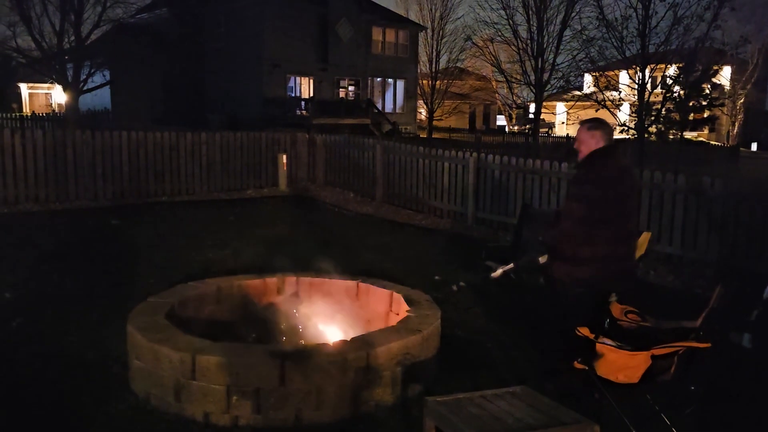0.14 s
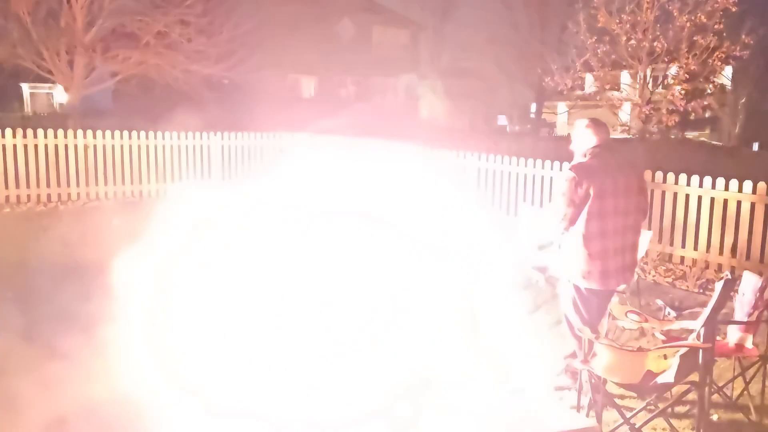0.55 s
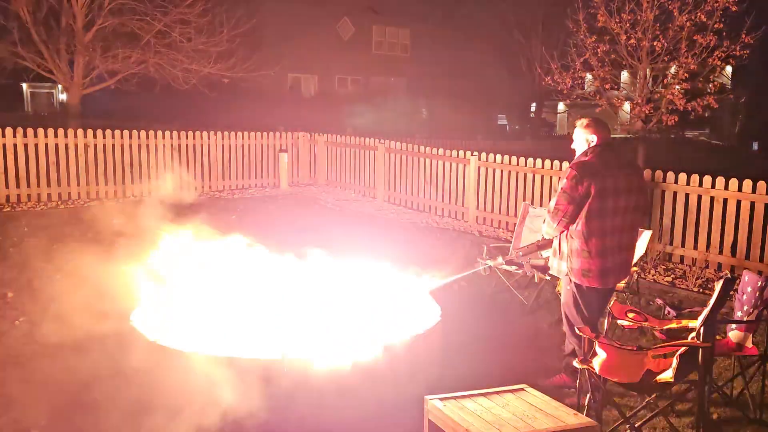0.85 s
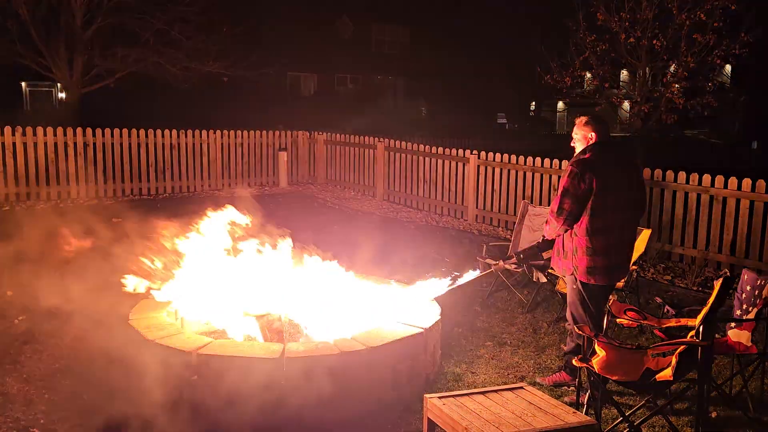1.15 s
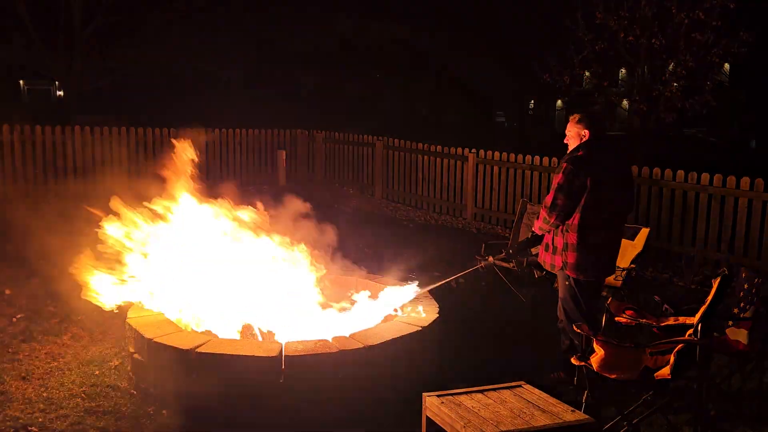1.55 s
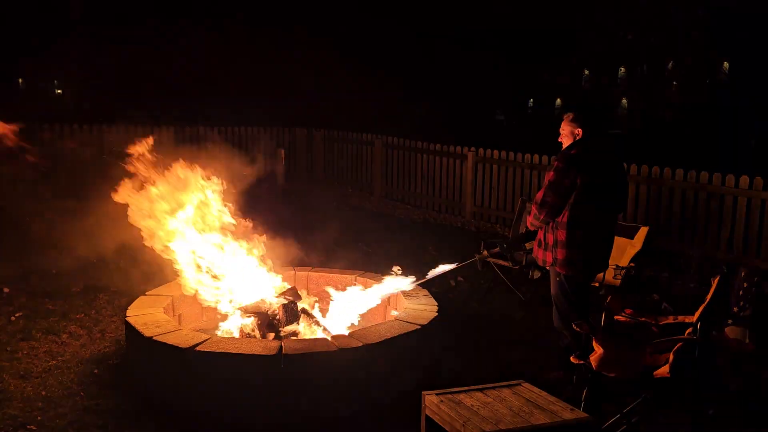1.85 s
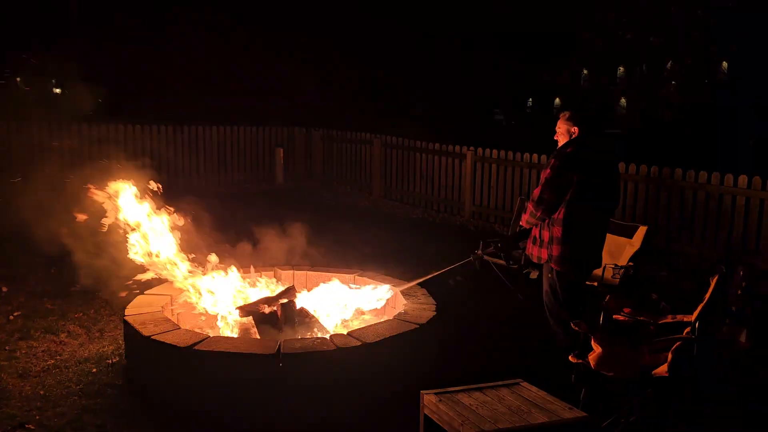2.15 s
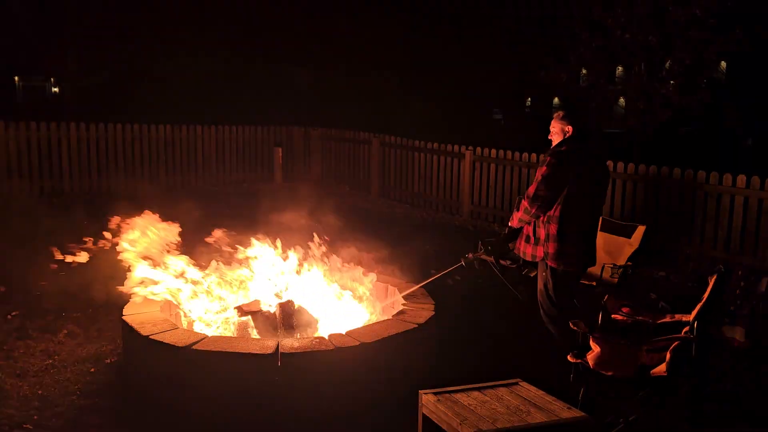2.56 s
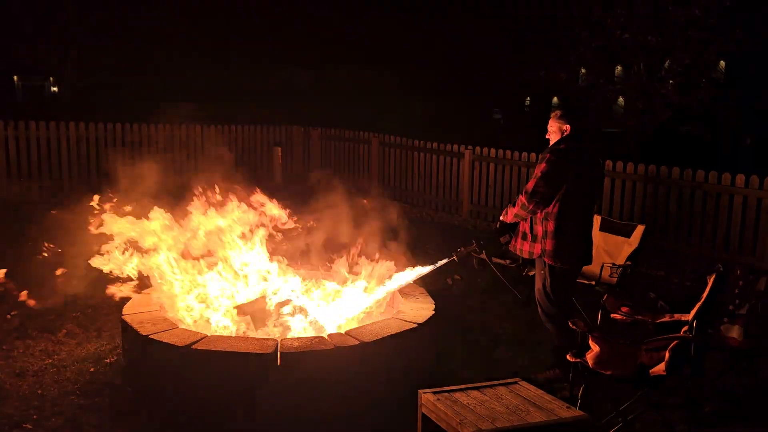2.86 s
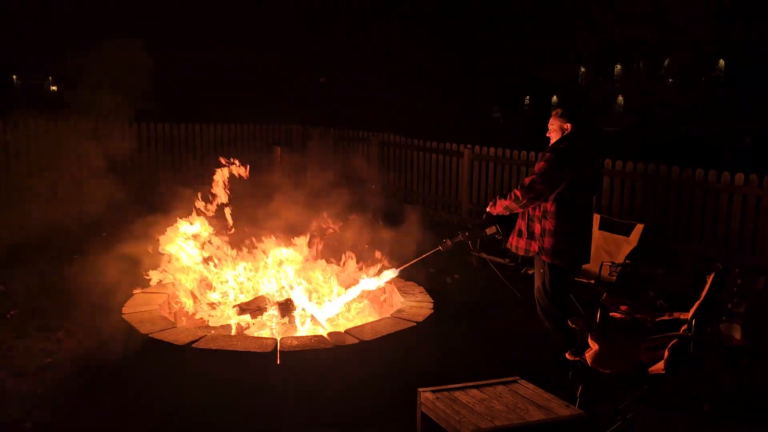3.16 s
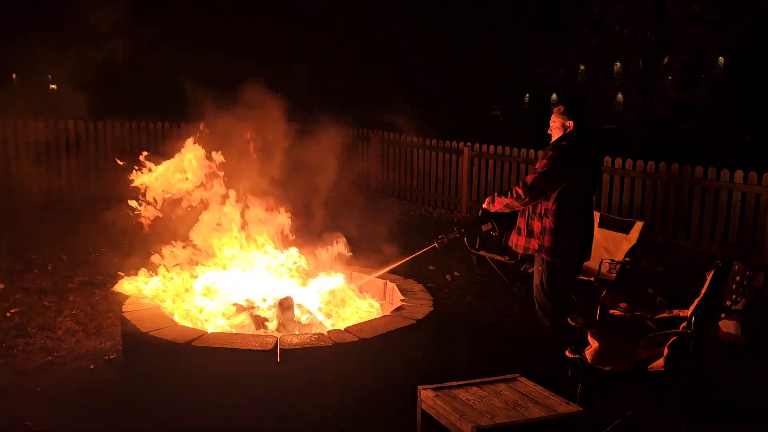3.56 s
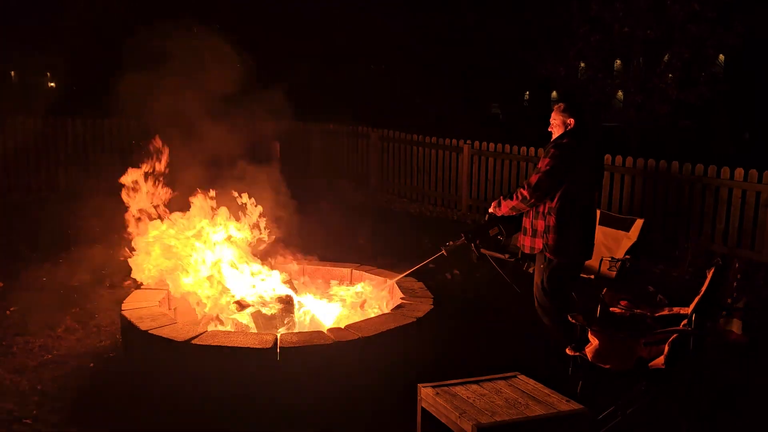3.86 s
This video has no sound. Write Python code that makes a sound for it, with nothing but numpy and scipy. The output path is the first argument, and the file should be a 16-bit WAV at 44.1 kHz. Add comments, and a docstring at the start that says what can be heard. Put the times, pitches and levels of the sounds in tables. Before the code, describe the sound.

A handheld flame gun in a quiet backyard at night: trigger rustle and click, pump spinning up, then fast even igniter ticks over a deep surging flame roar, recorded in stereo from a few metres away.

```python
"""Backyard fire pit at night: a hand-held flame gun is fired a few metres from a phone.
Filtered noise and a wavering sine make night air and hum; noise bursts and decaying modes make trigger rustle and clicks.
Steady ticks ring the igniter's modes; motor harmonics and shaken casing whine in the pump; flickering noise is fuel hiss.
The lit jet is random bursts coloured into rumble and surging roar. Windowed sines are low thumps: a soft air puff
before lighting, then puffs of the flame."""
import sys
import numpy as np
from scipy import signal
from scipy.fft import rfft, irfft
from scipy.io import wavfile
from scipy.ndimage import uniform_filter1d

SR = 44100
rng = np.random.default_rng(int(sys.argv[2]) if len(sys.argv) > 2 else 0)


def wrap_up_sound(samples):
    """Save the sound to the file named by the first command line argument, as 16-bit audio."""
    columns = np.atleast_2d(samples).T
    # keep every value between -1 and 1, then stretch to whole-number steps
    tamed = np.clip(columns, -1, 1)
    steps = np.round(tamed * 32767).astype(np.int16)
    wavfile.write(sys.argv[1], SR, steps)


def natural_amplitude(level_db):
    """Convert a level in decibels to a linear amplitude factor, elementwise."""
    exponent = np.asarray(level_db, float) / 20
    return 10 ** exponent


N = 176400
TIME_S = np.arange(N) / SR
FREQ_HZ = np.maximum(np.arange(N // 2 + 1) * SR / N, 1)
RIGHT_LAG_S = 0.000091
BASS_WIDTH, TREBLE_WIDTH = 0.059, 1  # independent share of each channel, 0-1


def level(x, db):
    """Scale to an rms level."""
    return x * natural_amplitude(db) / np.sqrt(np.mean(x ** 2))


def curve(points):
    """Gain per frequency bin from (frequency [Hz], gain [dB]) points, log-frequency interpolation."""
    hz, db = np.array(points, float).T
    gain_db = np.interp(np.log(FREQ_HZ), np.log(np.maximum(hz, 1)), db, left=-80, right=-80)
    return natural_amplitude(gain_db)


def walk(rate_hz):
    """Random levels held 1 / rate_hz and smoothed twice; spread near 1."""
    hold = int(SR / rate_hz)
    steps = np.repeat(rng.standard_normal(N // hold + 1), hold)
    return 1.52 * uniform_filter1d(uniform_filter1d(steps, hold), hold)[:N]


def eddies(rate_hz, spread_db):
    """Random bursts of unequal size: mostly small, a few large."""
    size = natural_amplitude(spread_db * rng.exponential(size=N))
    return rng.standard_normal(N) * size * (rng.random(N) < rate_hz / SR)


def turbulent(source, spectrum, shared_db, own_db, flicker_hz, alike_hz):
    """Coloured stereo turbulence at 0 dB rms; octave bands flicker together and alone; ears differ above alike_hz."""
    rise = 1 / np.sqrt(1 + (alike_hz / FREQ_HZ) ** 2)
    width = np.clip(BASS_WIDTH + (TREBLE_WIDTH - BASS_WIDTH) * rise, 0, 1)
    mid = np.sqrt(1 - width ** 2) * rfft(level(source, 0))
    lagged = mid * np.exp(-2j * np.pi * FREQ_HZ * RIGHT_LAG_S)
    side = width * rfft(rng.standard_normal((2, N)))
    pair = curve(spectrum) * (np.array([mid, lagged]) + side)

    out, shared = 0, walk(flicker_hz)
    low_octave, high_octave = np.floor(np.log2(spectrum[0][0])), np.log2(spectrum[-1][0])
    for hz in 2 ** np.arange(low_octave, high_octave + 1):
        band = np.cos(np.pi / 2 * np.clip(np.log2(FREQ_HZ / hz), -1, 1)) ** 2
        flicker_db = shared_db * shared + own_db * walk(flicker_hz * 1.7)
        out = out + irfft(pair * band, N) * natural_amplitude(flicker_db)
    return level(out, 0)


def ring(hz, t60_s, length_s):
    """One decaying mode."""
    t = TIME_S[:int(length_s * SR)]
    return np.sin(2 * np.pi * hz * t) * np.exp(-np.log(1000) * t / t60_s)


def add(out, sound, at_s):
    """Mix a sound in at a time."""
    i = int(at_s * SR)
    out[..., i:i + sound.shape[-1]] += sound[..., :N - i]


# Night air spectrum: (frequency [Hz], relative density [dB per Hz])
NIGHT_SPECTRUM = [(15, -14), (25, -3.5), (45, -2), (80, -7), (130, -9.5), (160, -25), (240, -28),
                  (350, -44), (650, -33), (900, -40.5), (2400, -48), (4000, -48.5), (7500, -49),
                  (10000, -58), (16500, -66)]
NIGHT_DB, HUM_HZ, HUM_DB = -49.5, 118.6, -51


def night():
    """Air rumble and hiss, plus a nearby machine's hum wavering in pitch and level."""
    air = natural_amplitude(NIGHT_DB) * turbulent(rng.standard_normal(N), NIGHT_SPECTRUM, .8, 1.7, 8, 500)
    hum_gain = np.sqrt(2) * natural_amplitude(HUM_DB + 1.3 * walk(14))
    hum_phase = 2 * np.pi * np.cumsum(HUM_HZ + 0.74 * walk(6.3)) / SR
    return air + hum_gain * np.sin(hum_phase)


# Sleeve and glove on the grip: (time [s], level [dB])
RUSTLE_LEVEL = [(0.06, -89), (0.092, -88), (0.12, -63), (0.17, -90), (0.32, -93), (0.336, -57.5),
                (0.37, -45), (0.382, -52), (0.392, -45.5), (0.428, -71), (0.472, -78), (0.476, -73),
                (0.5, -87)]
# Cloth spectrum: (frequency [Hz], relative density [dB per Hz])
CLOTH_SPECTRUM = [(180, -24), (300, -17), (513, -10), (729, -13), (1270, -18), (2610, -25), (3770, -11.5),
                  (7250, -8), (8580, -15), (14200, -22), (16500, -42)]
# Trigger clicks: (time [s], level of the body mode [dB], body mode [Hz])
TRIGGER_CLICKS = [(.364, -49, 890), (.388, -30.5, 300), (0.423, -48, 600)]


def grip():
    """Cloth friction is bursts of coloured noise; each trigger click rings a body mode and two higher modes."""
    s, db = np.array(RUSTLE_LEVEL).T
    cloth = turbulent(eddies(6000, 3.0), CLOTH_SPECTRUM, 0.8, 1.2, 60, 5000)
    out = cloth * natural_amplitude(np.interp(TIME_S, s, db, left=-120, right=-120))
    for at_s, db, hz in TRIGGER_CLICKS:
        click = ring(hz, 0.0085, .05) + .5 * ring(7200, 0.0047, .05) + .2 * ring(3600, 0.0097, .05)
        add(out, natural_amplitude(db) * click, at_s)
    return out


# Each tick, its rebounds and its echo off the stones: (delay [s], relative level [dB])
TICK_REBOUNDS = [(0, 2.5), (.0019, -2.5), (.0037, 1), (.0053, 0)]
# What a tick rings with: (frequency [Hz], relative level [dB], t60 [s])
TICK_RING_MODES = [(1830, -34, 0.0096), (2540, -9, 0.0089), (4580, -3, 0.0058), (6550, -12, 0.019),
                   (7020, -8.5, 0.0089), (7670, -9.5, 0.01), (8270, -2.5, 0.0048), (9300, -35, 0.0033),
                   (11140, -22, 0.011), (12700, -7, 0.0039), (14400, -9, 0.0045), (15500, -20, .004)]
TICK_FIRST_S, TICK_PERIOD_S = .5617, .053472
TICK_GAIN_DB, TICK_SCATTER_DB, TICK_COLOUR_DB = -27.5, 1.9, 1.8


def igniter():
    """Even ticks: a crack and short modes, rebounding; each ear's colour differs and drifts as the gun is moved."""
    at = (np.arange(TICK_FIRST_S, N / SR, TICK_PERIOD_S) * SR).astype(int)
    ear_lag = np.array([[0], [int(RIGHT_LAG_S * SR)]])
    # column 0: whole tick; the rest: each rebound
    scatter_db = TICK_SCATTER_DB * rng.standard_normal((len(at), 1 + len(TICK_REBOUNDS)))
    ringing = np.zeros((2, N))
    for hz, db, t60_s in TICK_RING_MODES:
        blows, drift = np.zeros((2, N)), walk(2.666)[at]
        for k, (lag_s, lag_db) in enumerate(TICK_REBOUNDS):
            jitter = rng.integers(0, 9, len(at))
            place = np.minimum(at + int(lag_s * SR) + jitter + ear_lag, N - 1)
            colour_db = TICK_COLOUR_DB * (drift + 1.2 * rng.standard_normal((2, len(at))))
            gain = natural_amplitude(db + lag_db + scatter_db[:, 0] + scatter_db[:, k + 1] + colour_db)
            np.put_along_axis(blows, place, gain, axis=1)
        ringing += signal.fftconvolve(blows, ring(hz, t60_s, .04)[None], axes=1)[:, :N]

    since_s = (TIME_S - TICK_FIRST_S) % TICK_PERIOD_S
    decay = np.exp(-since_s / 0.0026) + 0.21 * np.exp(-since_s / 0.0054)
    gate = (TIME_S > TICK_FIRST_S) * decay
    colour = curve([(2000, -11), (6000, -5), (8000, 3), (10500, -6), (13500, 0.0), (16800, 0.5)])
    crack = irfft(rfft(rng.standard_normal((2, N))) * colour, N)
    return natural_amplitude(TICK_GAIN_DB) * (.5 * ringing + level(crack, -1) * gate)


# Pump run: (time [s], commutator rate [Hz], share by which the gear tone at 5.6 replaces 5.83 and 6 [1])
PUMP_RUN = [(.505, 400, .1), (.545, 432, .1), (.62, 437, .1), (1.5, 436, .15), (2.8, 434.6, .35),
            (3.15, 434, .95), (4, 433.7, 1.1)]
# Whine partials: (multiple of commutator rate [1], rms before gear weight and motor envelope [dB])
WHINE_PARTIALS = [(3, -66), (4, -61.5), (5, -68), (5.6, -49), (5.83, -55), (6, -52.5), (7, -66), (8, -62),
                  (10.4, -82), (12, -73), (27, -69)]
# Casing resonances shaken by the motor: (frequency [Hz], width [Hz], rms before motor envelope [dB])
CASING_MODES = [(1860, 90, -69.5), (2534, 420, -55.5), (4430, 200, -53.5), (5060, 200, -77),
                (6250, 250, -69), (11600, 430, -61)]
# Fuel spray spectrum: (frequency [Hz], relative density [dB per Hz])
HISS_SPECTRUM = [(600, 0.5), (1500, -4), (2500, -1.5), (4400, -1.5), (5000, 0.5), (5300, -2), (6500, -4),
                 (7500, 0), (9500, -3), (10600, -5.5), (11600, -2), (12300, -3), (13500, -3.5), (15000, -6),
                 (15600, -10), (17000, 4.5)]
PUMP_ON_S, PUMP_RISE_S, SPRAY_RISE_S = 0.5046, 0.059, 0.051
START_LOAD_DB, START_LOAD_S = 9, .08
HISS_DB, WHINE_WAVER_DB = -42, 1.1


def pump_and_spray():
    """The pump spins up: commutator and gear partials whine and the casing buzzes over the spray's hiss."""
    s, hz, share = np.array(PUMP_RUN).T
    since_s = np.clip(TIME_S - PUMP_ON_S, 0, None)
    start_load = natural_amplitude(START_LOAD_DB * np.exp(-since_s / START_LOAD_S))
    motor = (1 - np.exp(-since_s / PUMP_RISE_S)) * start_load
    phase = 2 * np.pi * np.cumsum(np.interp(TIME_S, s, hz) + 0.33 * walk(20)) / SR
    gear = np.interp(TIME_S, s, share)

    body = 0
    for multiple, db in WHINE_PARTIALS:
        if 5.5 < multiple < 5.7:
            weight = gear
        elif 5.7 < multiple < 6.1:
            weight = 1.25 - gear
        else:
            weight = .6 + .5 * gear
        gain = np.sqrt(2) * natural_amplitude(db + WHINE_WAVER_DB * walk(20))
        body = body + weight * gain * np.sin(multiple * phase)
    shake = rfft(rng.standard_normal(N))
    for hz, width_hz, db in CASING_MODES:
        resonance = 1 / (1 + (2 * (FREQ_HZ - hz) / width_hz) ** 2)
        body = body + level(irfft(shake * resonance, N), db)
    pump = motor * np.array([body, np.roll(body, int(RIGHT_LAG_S * SR))])

    hiss = turbulent(rng.standard_normal(N), HISS_SPECTRUM, 1.0, 0.68, 15, 1670)
    spray = (1 - np.exp(-since_s / SPRAY_RISE_S)) ** 2
    return pump + spray * natural_amplitude(HISS_DB) * hiss


# Flame: (time [s], fireball rumble before RUMBLE_GAIN_DB [dB], roar of the jet on the logs before ROAR_GAIN_DB [dB])
FLAME_LEVEL = [(0.56, -66, -69), (0.61, -23, -48), (0.68, -18, -29.5), (0.7, -22, -34.5),
               (0.81, -27.5, -31), (1.04, -16, -42), (1.11, -25, -46), (1.15, -18, -34), (1.18, -17.5, -31),
               (1.28, -29, -31.5), (1.59, -21, -34.5), (1.63, -18.5, -30.5), (1.75, -25.5, -40.5),
               (1.8, -14.5, -29.5), (1.84, -21.5, -31.5), (2.16, -26, -32.5), (2.26, -25.5, -37),
               (2.33, -16, -36), (2.37, -23, -40.5), (2.5, -22.5, -33), (2.6, -23, -41.5),
               (2.69, -18, -46.5), (2.73, -20, -39.5), (2.76, -24, -33.5), (3.03, -26, -31.5),
               (3.2, -26.5, -36.5), (3.42, -20.5, -35), (3.48, -26.5, -41.5), (3.66, -21.5, -44),
               (3.69, -15, -42), (3.73, -23.5, -45.5), (3.87, -18.5, -45), (3.92, -24, -47.5),
               (4.0, -17, -51)]
# Rumble spectrum: (frequency [Hz], relative density [dB per Hz])
RUMBLE_SPECTRUM = [(11, -34), (18, -16), (43, 1), (86, 5), (104, 4), (150, -15), (241, -8.5), (363, -36),
                   (420, -29.5), (550, -53), (920, -120)]
# Roar spectrum: (frequency [Hz], relative density [dB per Hz])
ROAR_SPECTRUM = [(76, -37), (130, 2.5), (145, 0), (243, -2.5), (369, -19), (399, -14.5), (616, -9.5),
                 (949, -18.5), (1190, -24), (1440, -22.5), (2150, -26), (2520, -23), (3320, -31),
                 (4720, -37), (6000, -36.5), (7800, -67), (13200, -120)]
# Low thumps, a soft air puff before lighting, then puffs of the flame:
# (centre [s], level before THUMP_GAIN_DB [dB], pitch [Hz], Gaussian width [cycles])
LOW_THUMPS = [(.24, -28.5, 46, 1), (.716, -4, 55, 0.65), (1.036, -9.5, 84.8, 4.2), (1.195, -3, 75.5, 0.72),
              (1.636, -7.5, 83, .8), (1.797, 2, 84.5, 0.7), (2.335, -3.5, 70, 1.05), (2.679, -5, 86.5, 2.7),
              (2.785, -5.5, 54.4, 0.92), (2.976, -5.5, 61.4, 0.43), (3.412, -12, 101, 0.51),
              (3.69, 0.5, 85, 0.78), (3.986, -6.5, 84.6, 1.27)]
RUMBLE_GAIN_DB, ROAR_GAIN_DB, THUMP_GAIN_DB = -0.5, 6, -8
RUMBLE_EDDIES_HZ, ROAR_EDDIES_HZ = 900, 9000  # burning eddies per s
LIGHT_S, THUMP_HALF_S = 0.043, .08


def flame_and_thumps():
    """Large eddies rumble, small ones roar; an air puff, then flame puffs, thump as Gaussian-windowed sines."""
    s, rumble_db, roar_db = np.array(FLAME_LEVEL).T
    lit = np.clip((TIME_S - s[0]) / LIGHT_S, 0, 1)
    rumble = turbulent(eddies(RUMBLE_EDDIES_HZ, 2.64), RUMBLE_SPECTRUM, 0.98, 1.13, 15, 2500)
    roar = turbulent(eddies(ROAR_EDDIES_HZ, 2.04), ROAR_SPECTRUM, 0.34, 1.0, 25.02, 2330)
    rumble = rumble * natural_amplitude(np.interp(TIME_S, s, rumble_db) + RUMBLE_GAIN_DB)
    roar = roar * natural_amplitude(np.interp(TIME_S, s, roar_db) + ROAR_GAIN_DB)
    out = lit * (rumble + roar)
    for at_s, db, hz, width_cycles in LOW_THUMPS:
        cycle = (TIME_S[:int(2 * THUMP_HALF_S * SR)] - THUMP_HALF_S) * hz
        thump = np.sin(2 * np.pi * cycle) * np.exp(-(cycle / width_cycles) ** 2)
        add(out, natural_amplitude(db + THUMP_GAIN_DB) * thump, at_s - THUMP_HALF_S)
    return out


def scene():
    """All sources at the phone."""
    return night() + grip() + igniter() + pump_and_spray() + flame_and_thumps()


def band_limit(x):
    """A steep low-pass at the top of the band."""
    return signal.sosfilt(signal.butter(12, 16640, fs=SR, output="sos"), x)


# The two microphone ports: (frequency [Hz], left minus right [dB])
PORT_BALANCE = [(60, -0.5), (110, 0.5), (200, -2), (380, 4), (700, -1), (1290, 5.5), (2380, -2),
                (4400, 0.5), (8120, 0.5), (15000, -1)]
TOP_HZ = 15900


def record(dry):
    """Two ports with their own colour and a steep top cut with a low shelf just above it."""
    balance = [(1, 0)] + [p for p in PORT_BALANCE if p[0] > 1] + [(SR, 0)]
    tilt = np.sqrt(curve(balance))  # half the difference on each side
    top = curve([(1, 0), (TOP_HZ - 150, 0), (TOP_HZ + 100, -18), (16600, -24), (16800, -70), (SR, -80)])
    ports = np.roll(irfft(top * np.array([tilt, 1 / tilt]), N), N // 2, axis=1)
    mix = signal.fftconvolve(dry, ports, axes=1)[:, N // 2:N // 2 + N]
    return band_limit(mix)


dry = scene()
out = record(dry)
wrap_up_sound(out)
```